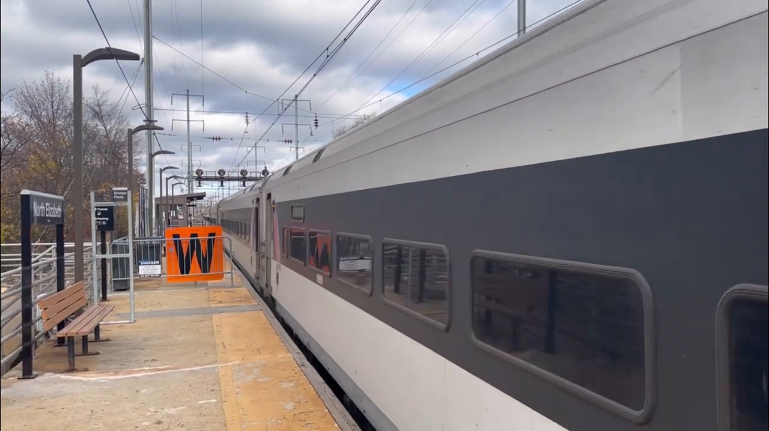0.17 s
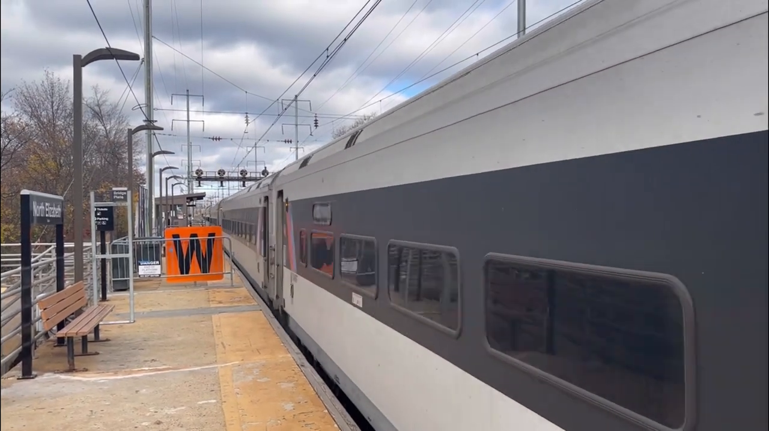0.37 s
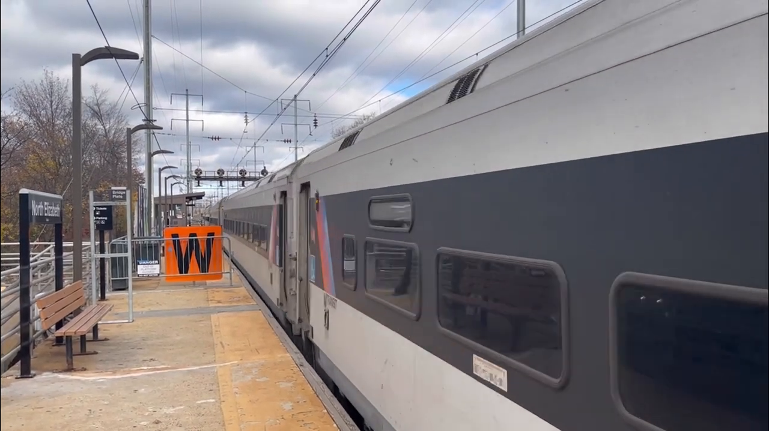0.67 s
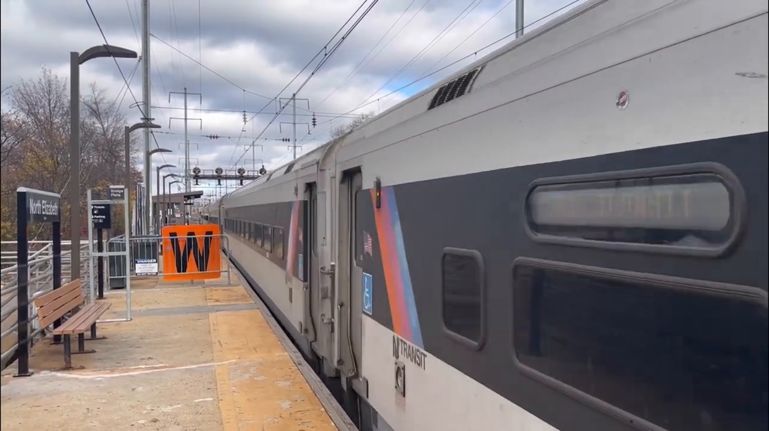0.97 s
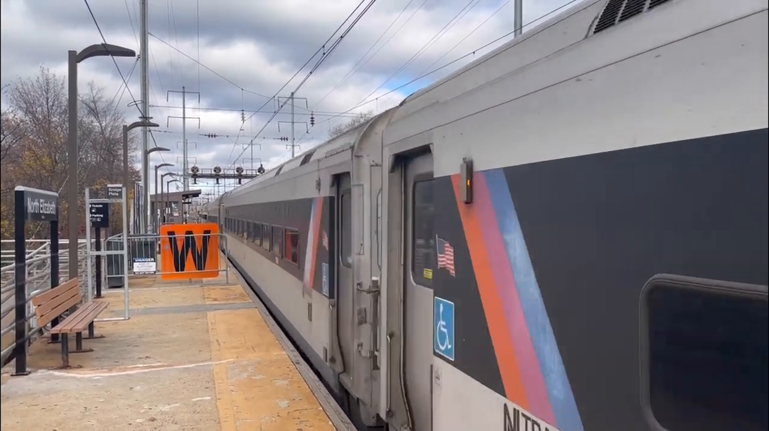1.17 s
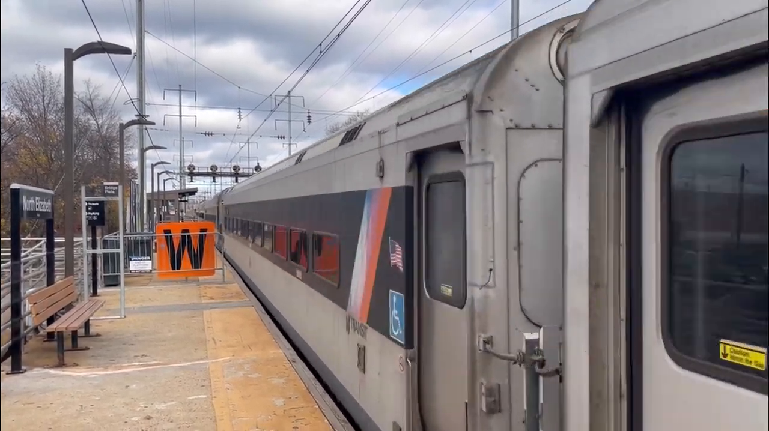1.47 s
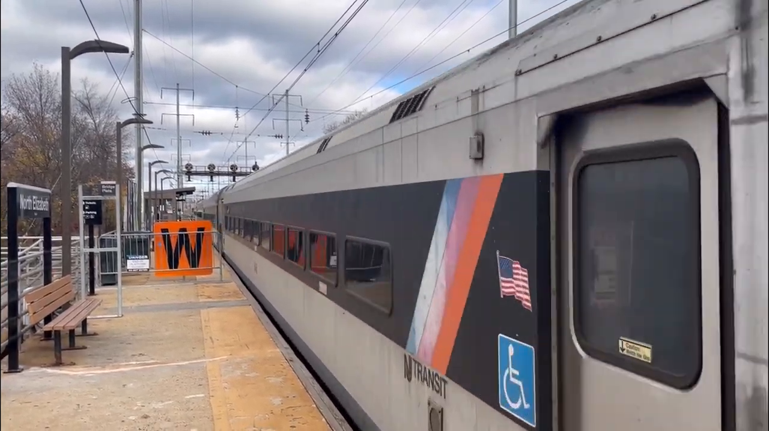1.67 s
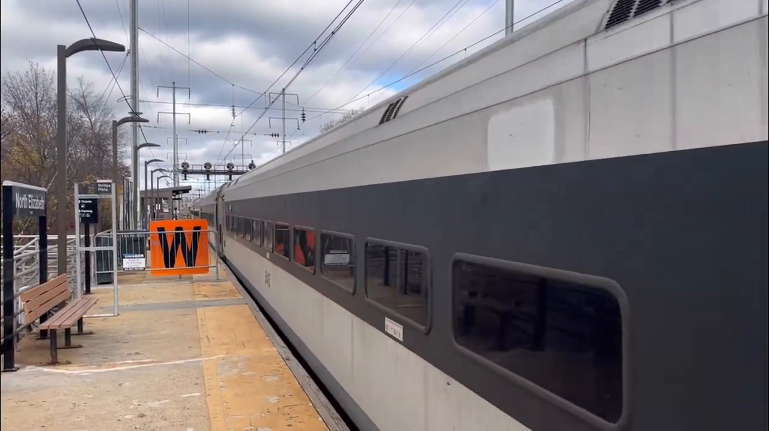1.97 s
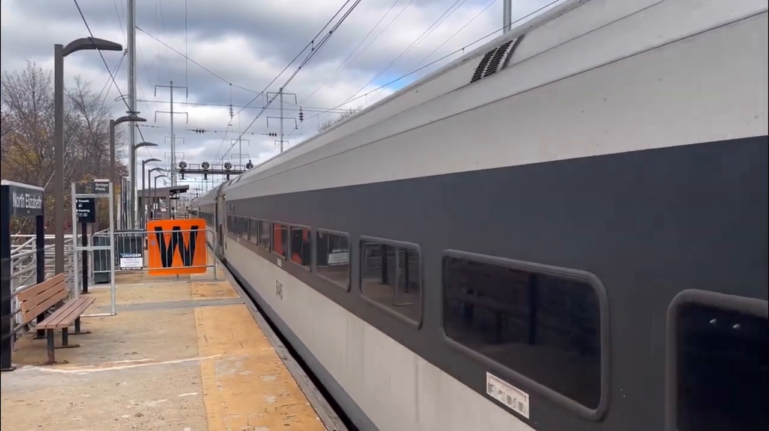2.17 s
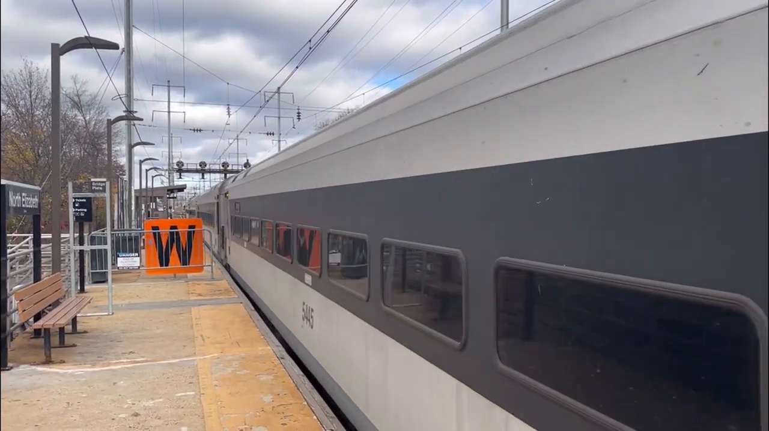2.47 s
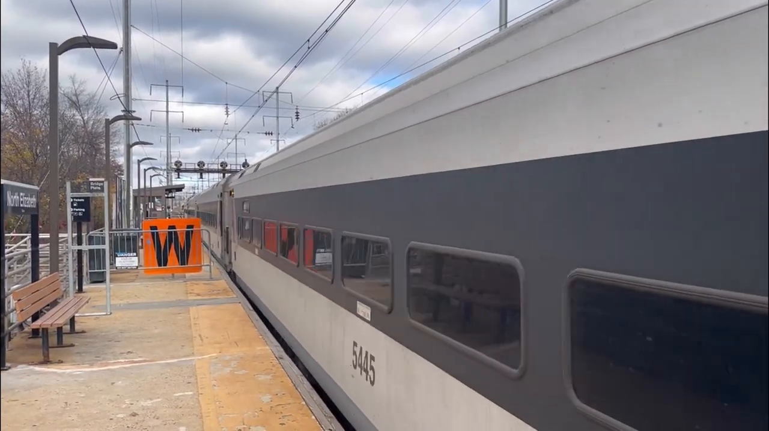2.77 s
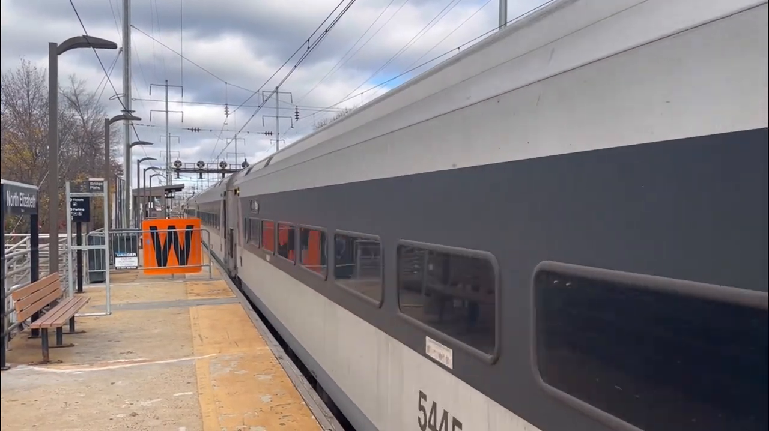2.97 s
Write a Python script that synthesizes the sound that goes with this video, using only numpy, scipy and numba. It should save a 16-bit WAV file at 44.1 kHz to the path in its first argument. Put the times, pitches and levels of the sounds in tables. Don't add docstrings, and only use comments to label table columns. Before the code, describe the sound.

Train cars clatter past a platform, knocking and rumbling, with hiss and a faint high squeal

```python
import sys
import numpy as np
from scipy import signal
from scipy.fft import rfft, irfft
from scipy.io import wavfile
from scipy.ndimage import uniform_filter1d
from numba import njit

SR = 44100
rng = np.random.default_rng(int(sys.argv[2]) if len(sys.argv) > 2 else 0)


def nominal_scale(level):
    x = np.asarray(level, float) / 20
    return 10 ** x


def wav_out(sig):
    wavfile.write(sys.argv[1], SR, np.round(np.clip(np.atleast_2d(sig).T, -1, 1) * 32767).astype(np.int16))


N = 136710
T = np.arange(N) / SR
F = np.fft.rfftfreq(N, 1 / SR)


@njit
def svf(x, hz, width):
    y, band, low = np.empty(len(x)), 0., 0.
    for i in range(len(x)):
        g, k = np.tan(np.pi * hz[i] / SR), width / hz[i]
        v = (band + g * (x[i] - low)) / (1 + g * (g + k))
        band = 2 * v - band
        low += 2 * g * v
        y[i] = k * v
    return y


def unit(x):
    return x / np.sqrt(np.mean(x ** 2))


def curve(table, column=1):
    points = np.array(table)
    return np.interp(T, points[:, 0], points[:, column])


def over_hz(table, hz, column=1):
    points = np.array(table)
    return np.interp(np.log(hz + 1), np.log(points[:, 0] + 1), points[:, column])


def walk(rate):
    hold = int(SR / rate)
    steps = np.repeat(rng.standard_normal(N // hold + 1), hold)
    return unit(uniform_filter1d(uniform_filter1d(steps, hold), hold)[:N])


def ring(hz, width, n=N):
    hz = np.clip(hz + np.zeros(n), 20, 19000.)
    channels = []
    for _ in range(2):
        once = svf(rng.standard_normal(n), hz, 1. * width)
        channels.append(svf(once, hz, 1. * width))
    return unit(np.array(channels))


def rush(colour, shared_db, own_db, rate):
    lo, hi = colour[0][0], colour[-1][0]
    beyond = np.log2(np.maximum(lo / (F + 1), 1) * np.maximum(F / hi, 1))
    spec = rfft(rng.standard_normal((2, N))) * nominal_scale(over_hz(colour, F) - 16.3 * beyond)
    half_octave = 2 * np.log2(F + 1)
    out, swell = 0, walk(rate)
    for centre in np.arange(np.floor(2 * np.log2(lo)) - 2, 2 * np.log2(hi) + 2):
        band = irfft(spec * np.maximum(1 - abs(half_octave - centre), 0), N)
        out = out + band * nominal_scale(shared_db * swell + own_db * walk(rate))
    return unit(out)


def add(out, t, sound):
    i = max(int(t * SR), 0)
    out[:, i:i + sound.shape[1]] += sound[:, :N - i]


# start_s, level_db
BOOM = [(0, -32), (.4, -29), (.55, -23), (.9, -28.5), (1.02, -21.5), (1.2, -25), (1.45, -29), (1.62, -28),
        (1.9, -24.5), (2.1, -23), (2.27, -30.5), (2.47, -26), (2.58, -29.5), (2.75, -21.5), (2.9, -29.5),
        (3.1, -28.5)]
# pitch_hz, density_db (per Hz)
BOOM_COLOUR = [(22, -37), (40, -7.5), (60, -3), (110, -2.5), (150, -4), (240, -14)]


def floor_boom():
    return nominal_scale(curve(BOOM) + 1.5) * rush(BOOM_COLOUR, 0.47, 0.62, 12.1)


# start_s, level_db
ROLL = [(0, -28), (.35, -27.5), (.7, -27), (.95, -24.5), (1.15, -26.5), (1.3, -26.5), (1.45, -25),
        (1.6, -28.5), (1.75, -26.5), (1.88, -27.5), (2.0, -28), (2.22, -29.5), (2.7, -31), (2.78, -29),
        (2.9, -31), (3.1, -31)]
# pitch_hz, density_db (per Hz)
ROLL_COLOUR = [(90, -7.5), (160, -3), (260, -1.5), (400, -6.5), (750, -12), (1000, -20), (1500, -23),
               (2600, -40.5)]
UNLOAD_DB, UNLOAD_S = -6, .014


def rolling_wheels():
    gap_db = sum(UNLOAD_DB * np.exp(-((T - s) / UNLOAD_S + 1) ** 2) for s, *_ in KNOCKS)
    return nominal_scale(curve(ROLL) + gap_db + 1) * rush(ROLL_COLOUR, 1.2, 1.0, 14)


# pitch_hz, density_db (per Hz)
RAIL_COLOUR = [(700, 1.5), (1200, 3.5), (1800, 1), (2600, -4), (3800, -10), (5000, -11), (7000, -18.5),
               (10000, -31)]
# pitch_hz, width_hz, level_db (over the rail noise)
RAIL_RINGS = [(1690, 160, -6.5), (2300, 300, -14), (3090, 300, -16), (3900, 350, -16), (4800, 350, -24)]
RAIL_DB, RAIL_FOLLOWS = -41.5, 1


def ringing_rail():
    roll_db = curve(ROLL)
    rail = rush(RAIL_COLOUR, 0.24, 1.0, 9.63)
    for hz, width, db in RAIL_RINGS:
        rail = rail + nominal_scale(db + 0.17 * walk(7.7)) * ring(hz, width)
    return rail * nominal_scale(RAIL_DB + RAIL_FOLLOWS * (roll_db - roll_db.mean()))


# start_s, level_db
HISS = [(0, -59.5), (.3, -55.5), (.75, -51.5), (.86, -48.5), (1.0, -48.5), (1.05, -51), (1.12, -46),
        (1.18, -51.5), (1.3, -51), (1.47, -51.5), (1.62, -57), (1.7, -48.5), (1.77, -56), (1.83, -53.5),
        (1.9, -60.5), (2.3, -62), (3.1, -65.5)]
# pitch_hz, density_db (per Hz)
HISS_COLOUR = [(3000, 1.5), (5300, -4), (6800, -1), (8000, -0.5), (9500, -1), (10500, -9), (12000, -19.5),
               (14200, -15)]


def bogie_hiss():
    return nominal_scale(curve(HISS) + 7.0) * rush(HISS_COLOUR, 0.74, 1.0, 7.75)


# start_s, peak_db, pitch_hz
PLATES = [(0.05, -27, 470), (0.107, -23.5, 480), (0.216, -20.5, 647), (0.248, -19.5, 492),
          (0.306, -24.5, 684), (0.386, -19.5, 664), (0.49, -20, 480), (0.519, -22.5, 654),
          (0.669, -22.5, 423), (0.759, -22, 457), (0.801, -21.5, 627), (0.89, -21, 560),
          (0.941, -16.5, 402), (1.005, -19, 385), (1.041, -19, 720), (1.079, -13, 445), (1.116, -12, 441),
          (1.176, -14, 505), (1.236, -16, 413), (1.285, -21, 493), (1.329, -24, 376), (1.386, -14.5, 460),
          (1.468, -21.5, 767), (1.634, -21.5, 386), (1.679, -21, 488), (1.765, -19, 484),
          (1.955, -20.5, 379), (2.071, -28, 388), (2.101, -18, 450), (2.701, -26, 482)]
PLATE_DB, PLATE_T60_S = -4, .13
PLATE_PAIR, PLATE_SIDE = 1.12, 0.35


def wheel_plates():
    out, t = np.zeros((2, N)), T[:SR // 5]
    rise = 1 - np.exp(-t / 0.00093)
    for s, db, hz in PLATES:
        phase = 2 * np.pi * rng.random((2, 1))
        pair = np.sin(2 * np.pi * hz * t) + 0.59 * np.sin(2 * np.pi * hz * PLATE_PAIR * t + phase)
        decay = nominal_scale(db + PLATE_DB - 60 * t / PLATE_T60_S)
        add(out, s, decay * rise * pair * np.array([[1], [PLATE_SIDE]]))
    return out


# start_s (centre of the swell), level_db, pitch_hz, length_s
CREAKS = [(0.083, -32.5, 490, 0.059), (0.149, -24, 250, 0.064), (0.278, -22, 241.3, 0.044),
          (0.963, -28, 402, 0.062), (1.187, -28, 750, 0.038), (1.22, -25.5, 570, 0.033),
          (1.291, -36, 486, .04), (1.358, -19, 290.5, .045), (1.502, -24, 280.6, 0.054),
          (1.034, -22, 280, .03), (1.435, -35, 1220, 0.096), (1.481, -43, 2553, 0.058),
          (1.49, -49, 3060, .05), (1.495, -32.5, 766, 0.046), (1.666, -17.5, 280, 0.039),
          (1.671, -34.5, 1092, 0.074), (1.785, -37, 1500, 0.036), (1.83, -40, 2520, 0.028),
          (1.835, -42, 2900, 0.041), (1.839, -34, 1320, .025), (2.175, -24, 215, 0.026),
          (.815, -34, 640, .04), (1.799, -20.5, 135, 0.055), (1.087, -30, 540, 0.046),
          (2.831, -33, 490, 0.055)]
CREAK_WAVER = .015


def steel_creaks():
    out, t = np.zeros((2, N)), T[:SR // 5]
    waver = np.cumsum(1 + CREAK_WAVER * walk(60)) / SR
    for s, db, hz, length in CREAKS:
        middle = min(t.mean(), s)
        cycles = hz * waver[int(s * SR * .9):][:len(t)] + rng.random((2, 1))
        swell = np.exp(-(2 * (t - middle) / length) ** 2)
        add(out, s - middle, nominal_scale(db) * swell * np.sin(2 * np.pi * cycles))
    return out


# start_s, peak_db, pitch_hz, clack_db
KNOCKS = [(0.118, -26, 173, -25.5), (0.223, -18.5, 257, -29), (0.332, -19, 173, -24.5),
          (0.406, -25, 268, -33), (0.482, -25, 155, -32.5), (0.517, -18.5, 157, -35),
          (0.668, -19.5, 232, -29.5), (0.759, -14.5, 222, -27.5), (0.803, -19, 164, -31),
          (0.893, -14.5, 195, -29), (0.959, -14.5, 159, -30), (1.04, -12, 165, -24),
          (1.087, -12, 176.4, -24.5), (1.173, -14, 207, -21), (1.23, -14.5, 198, -38),
          (1.334, -6.5, 155, -23.5), (1.39, -12.5, 158, -26.5), (1.431, -14.5, 217, -48),
          (1.467, -24.5, 294, -35), (1.633, -14, 260, -23.5), (1.679, -17, 280, -25.5),
          (1.794, -19, 235, -25), (1.953, -15, 160, -25), (1.989, -12, 229, -30), (2.069, -19, 215, -37),
          (2.112, -15, 164, -30), (2.172, -22.5, 194, -54), (2.335, -15, 158, -40),
          (2.739, -16.5, 144, -39), (2.821, -19.5, 154, -33)]
KNOCK_DB, KNOCK_RISE_S, KNOCK_HOLD_S, KNOCK_Q = -8, 0.00071, 0.037, 2.96
CLACK_DB, CLACK_HZ = -7.5, 750
FLOOR_RATIO, FLOOR_DB = 1.698, -6


def joint_knocks():
    out, t = np.zeros((2, N)), T[:SR // 4]
    fall = (1 - np.exp(-t / KNOCK_RISE_S)) * np.exp(-(t / KNOCK_HOLD_S) ** 2 / 2)
    for s, db, hz, clack_db in KNOCKS:
        floor_hz = hz * FLOOR_RATIO
        body = ring(hz, hz / KNOCK_Q, len(t))
        body = body + nominal_scale(FLOOR_DB) * ring(floor_hz, floor_hz / KNOCK_Q, len(t))
        clack = nominal_scale(clack_db + CLACK_DB) * ring(CLACK_HZ, 594, len(t))
        sound = nominal_scale(db + KNOCK_DB) * body + clack
        add(out, s, fall * sound[:, ::-1])
    return out


# start_s (centre), level_db, pitch_hz, width_hz, length_s
GUSTS = [
    (.525, -31, 590, 280, .08),
    (1.44, -43, 1250, 150, .14),
    (1.485, -47, 2530, 120, .05),
    (1.485, -50, 3150, 200, .05),
    (1.49, -34, 760, 120, .06),
    (1.832, -39, 2700, 1300, .025),
    (1.842, -46, 3600, 3000, .055),
    (1.836, -36.5, 1280, 450, .028),
]


def gap_gusts():
    out, t = np.zeros((2, N)), T[:SR // 4]
    middle = t.mean()
    for s, db, hz, width, length in GUSTS:
        swell = np.exp(-(2 * (t - middle) / length) ** 2)
        add(out, s - middle, nominal_scale(db) * swell * ring(hz, width, len(t)))
    return out


# start_s, peak_db, pitch_hz, length_s
THUMPS = [(0.549, -26, 117, 0.15), (0.999, -8.5, 137, 0.033), (1.533, -10.5, 167, 0.03),
          (1.888, -9.5, 119.2, 0.054), (2.202, -6.5, 92, 0.022), (2.33, -7, 152, 0.014),
          (2.522, -5, 67, 0.011), (2.694, -7, 87, 0.03), (2.733, -10.5, 115, 0.029),
          (2.767, -11, 63, 0.029), (2.96, -8.5, 75.5, 0.022)]
THUMP_DB = -5.5


def floor_thumps():
    out, t = np.zeros((2, N)), T[:SR // 4]
    for s, db, hz, length in THUMPS:
        swing = np.sin(2 * np.pi * hz * t) * np.exp(-(2 * t / length - 1.2) ** 2)
        add(out, s, nominal_scale(db + THUMP_DB) * swing * np.array([[1], [.3]]))
    return out


# start_s, pitch_hz, level_db
SQUEAL = [(.6, 4500, -68), (1.04, 4500, -61), (1.11, 4660, -52), (1.2, 5000, -55), (1.33, 5420, -46.5),
          (1.44, 5800, -52.5), (1.56, 6080, -44), (1.6, 6200, -63), (1.71, 6350, -53), (1.8, 6450, -59),
          (1.95, 6650, -64), (2.15, 6750, -60), (2.35, 6500, -65), (2.52, 6200, -57), (2.63, 6060, -57.5),
          (2.81, 6100, -49), (2.92, 6000, -50.5), (2.96, 6020, -55.5), (3.02, 6120, -51), (3.1, 6140, -53)]
SQUEAL_WIDTH_HZ, SQUEAL_FLUTTER_DB = 400, 2


def flange_squeal():
    hz = curve(SQUEAL) * (1 + .004 * walk(15))
    level_db = curve(SQUEAL, column=2) + SQUEAL_FLUTTER_DB * walk(24.5)
    return nominal_scale(level_db) * ring(hz, SQUEAL_WIDTH_HZ)


# pitch_hz, left_lead_rad, likeness (0-1), left_minus_right_db
PORTS = [(60, 0, .66, 0), (220, -.1, .83, .1), (800, -.8, .6, -1), (1650, -2.3, .55, 1.5),
         (2150, -1.1, .2, -1), (2600, .6, .5, 0), (3250, 1.5, .55, 1.6), (3900, 0, .27, 1.4),
         (4900, .6, .45, 1.8), (5500, .3, .05, 2.6), (6200, .3, .65, .9), (8150, 2.9, .86, 2.4),
         (10250, .4, .75, 0), (10450, 0, 1, 0), (13000, 0, 1, 0), (14300, -.3, .6, 0), (15100, -2.9, .6, 0)]


def scene():
    train = floor_boom() + rolling_wheels() + ringing_rail() + bogie_hiss()
    train = train + wheel_plates() + steel_creaks() + joint_knocks()
    train = train + gap_gusts() + floor_thumps() + flange_squeal()
    a, b = rfft(train)
    like = over_hz(PORTS, F, column=2)
    tilt = nominal_scale(over_hz(PORTS, F, column=3) / 2)
    same = np.sqrt((1 + like) / 2) * a
    other = np.sqrt((1 - like) / 2) * b
    turn = np.exp(.5j * over_hz(PORTS, F))
    return irfft(np.array([(same + other) * turn * tilt, (same - other) / turn / tilt]), N)


def band_limit(x):
    return signal.sosfilt(signal.butter(12, 15630, fs=SR, output="sos"), x)


def record(dry):
    mix = np.tanh(1.452 * dry) / 1.506
    return band_limit(mix)


dry = scene()
out = record(dry)
wav_out(out)
```